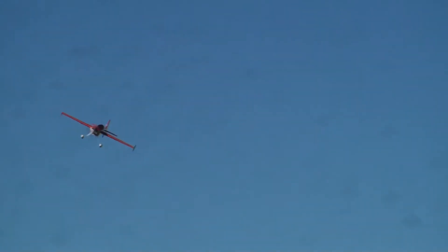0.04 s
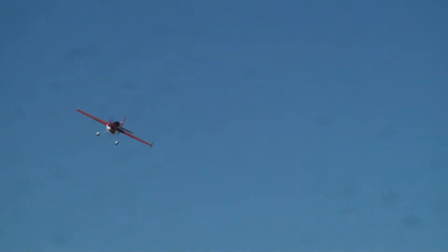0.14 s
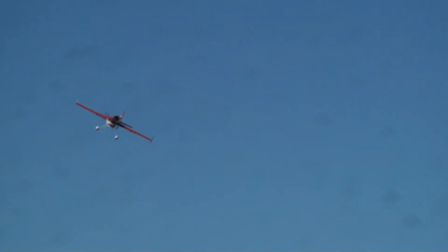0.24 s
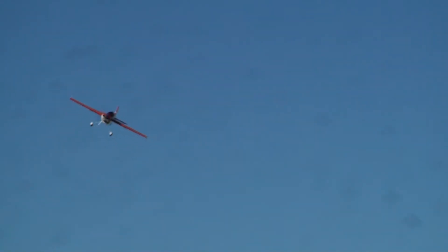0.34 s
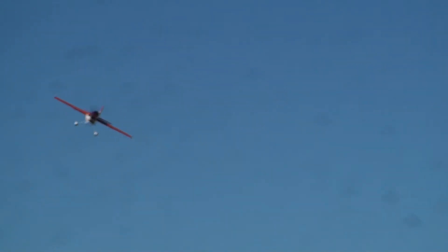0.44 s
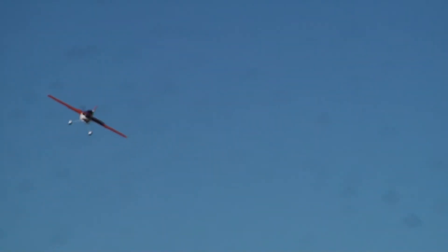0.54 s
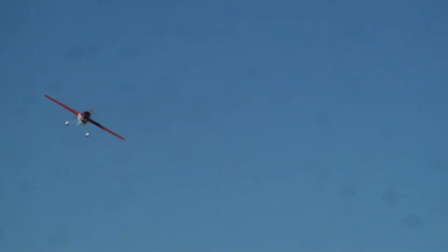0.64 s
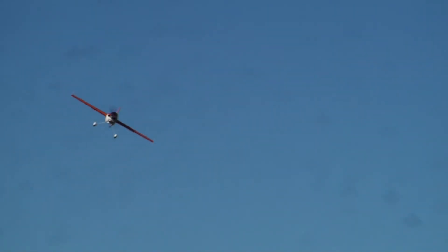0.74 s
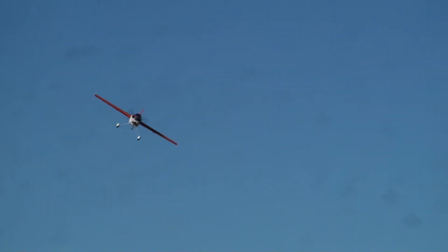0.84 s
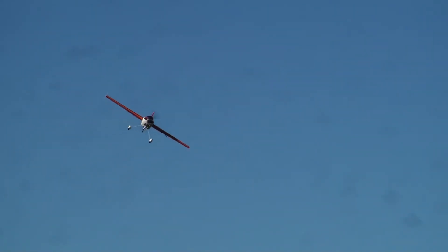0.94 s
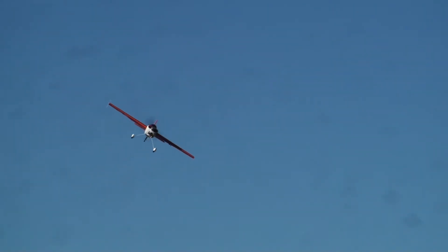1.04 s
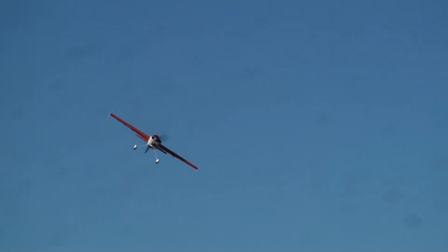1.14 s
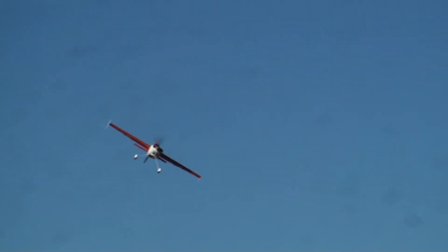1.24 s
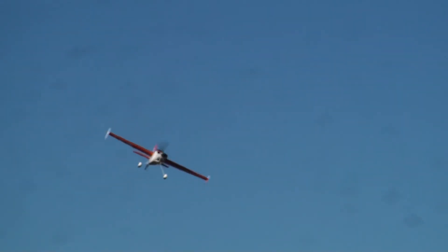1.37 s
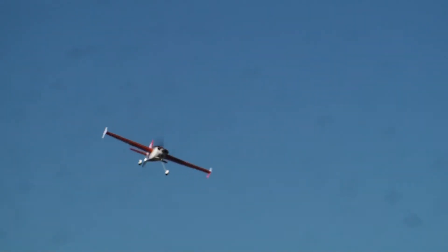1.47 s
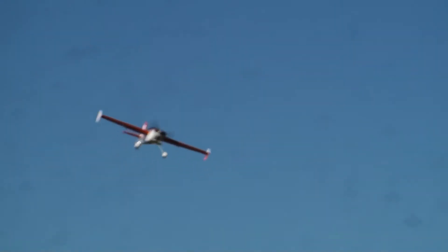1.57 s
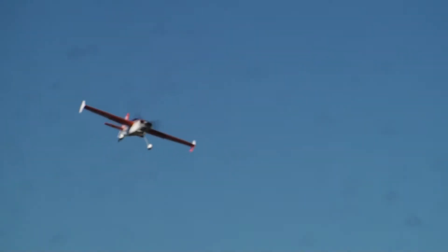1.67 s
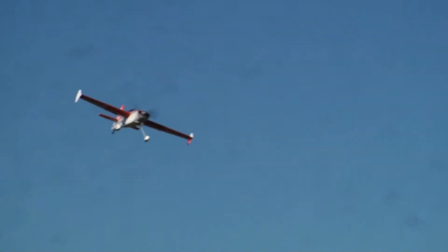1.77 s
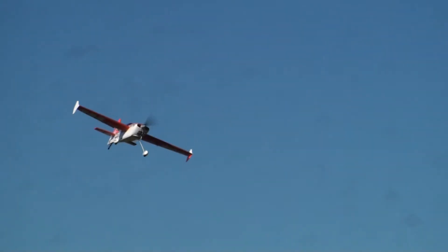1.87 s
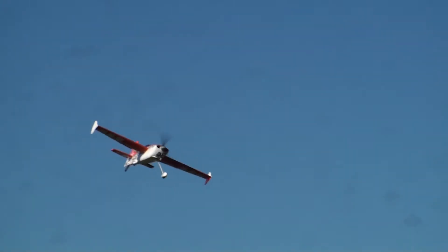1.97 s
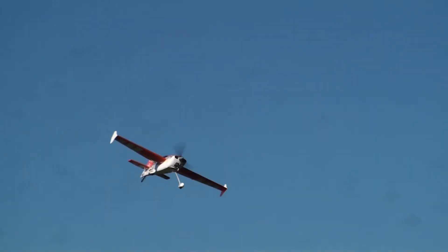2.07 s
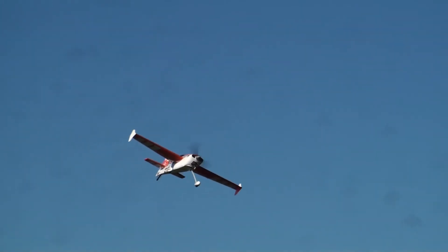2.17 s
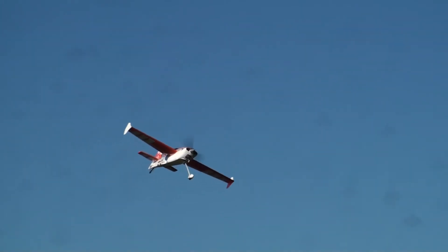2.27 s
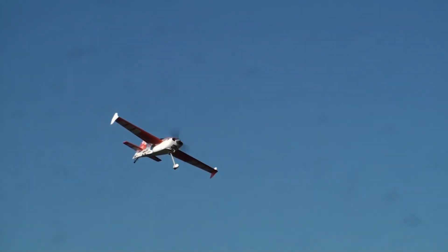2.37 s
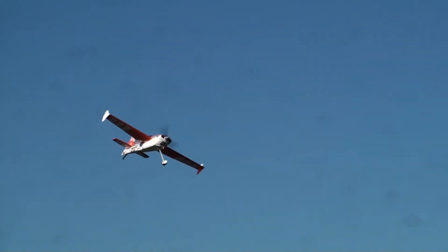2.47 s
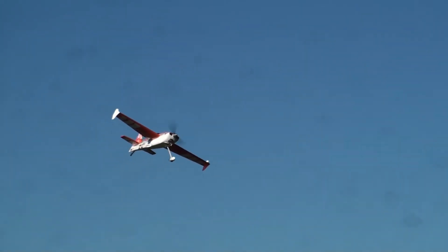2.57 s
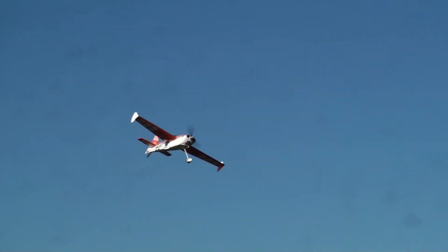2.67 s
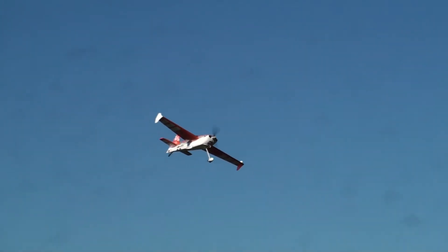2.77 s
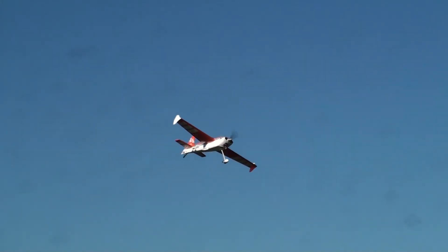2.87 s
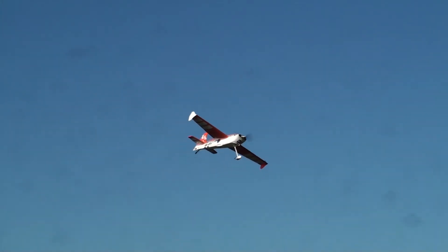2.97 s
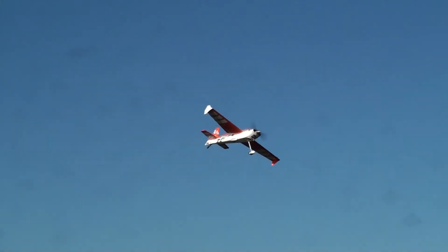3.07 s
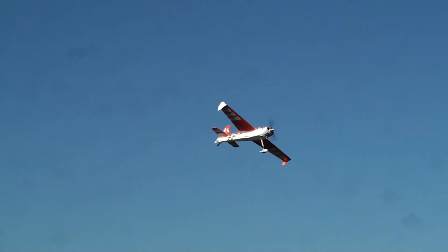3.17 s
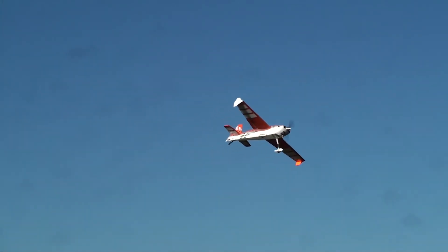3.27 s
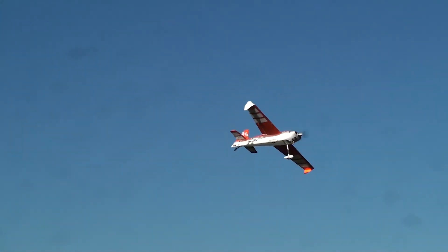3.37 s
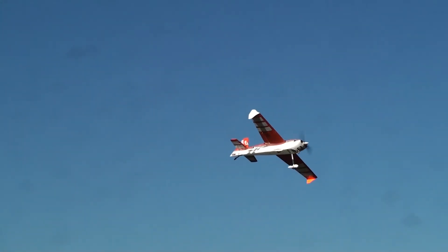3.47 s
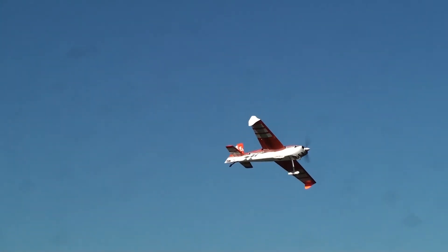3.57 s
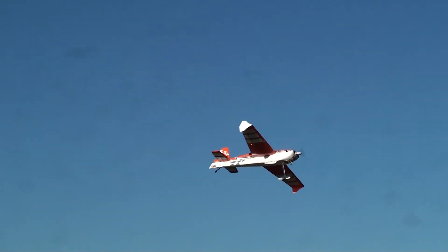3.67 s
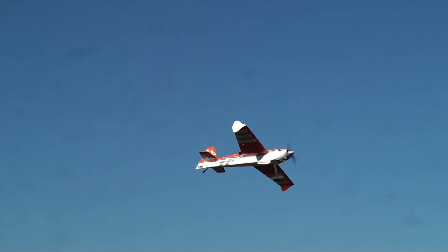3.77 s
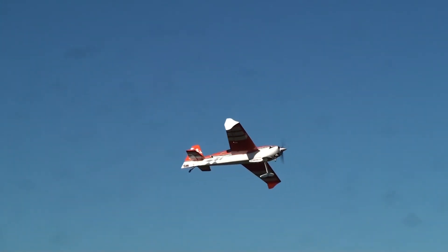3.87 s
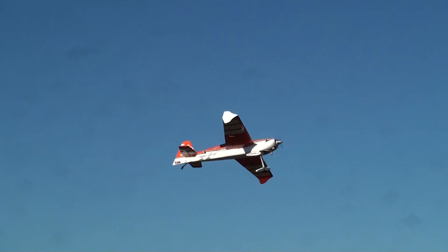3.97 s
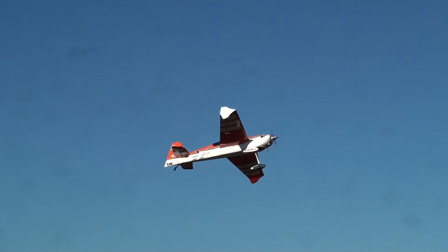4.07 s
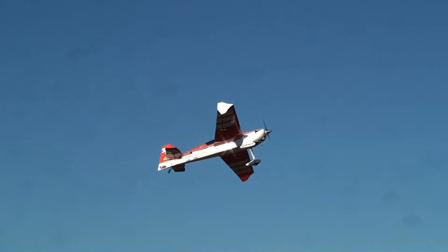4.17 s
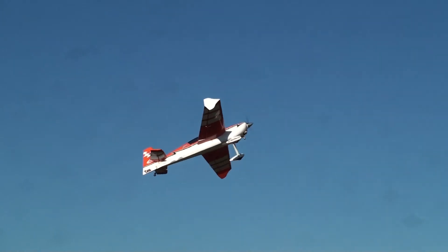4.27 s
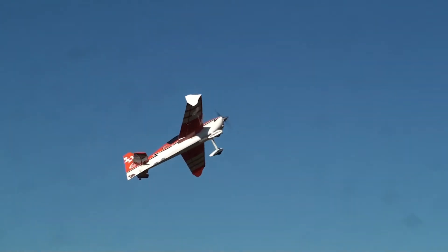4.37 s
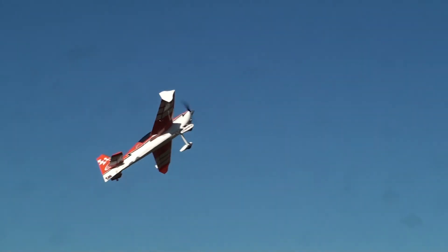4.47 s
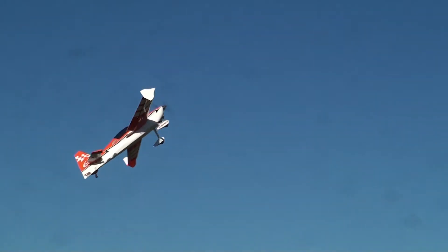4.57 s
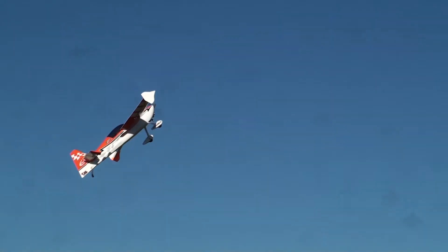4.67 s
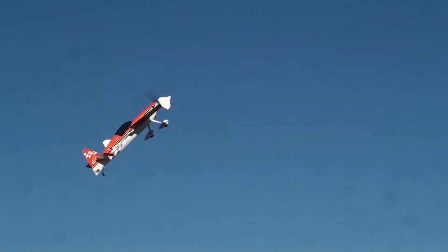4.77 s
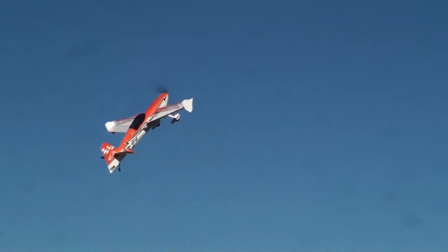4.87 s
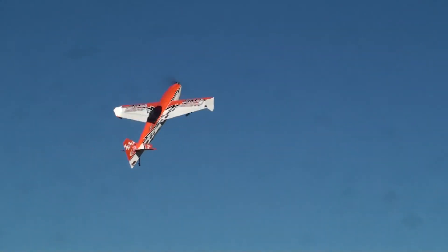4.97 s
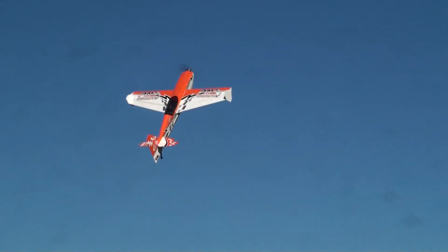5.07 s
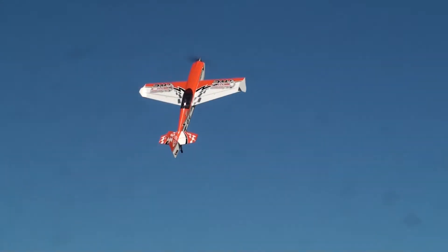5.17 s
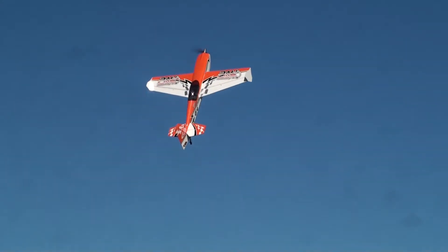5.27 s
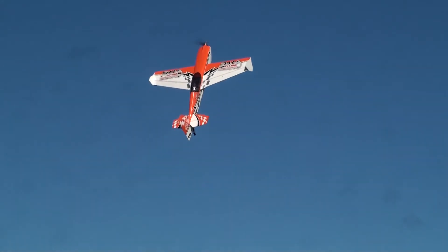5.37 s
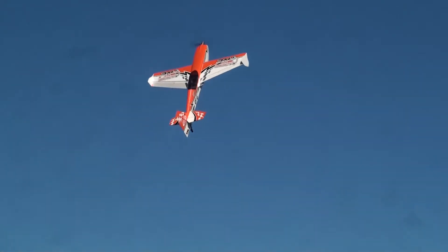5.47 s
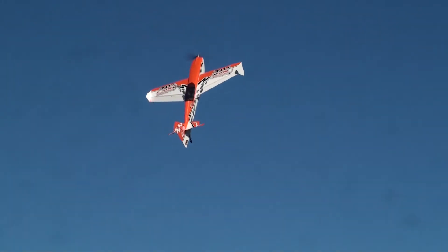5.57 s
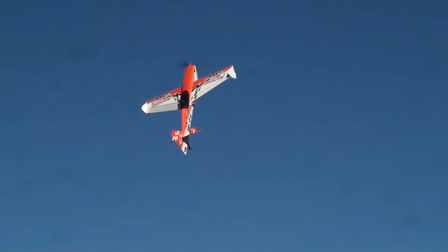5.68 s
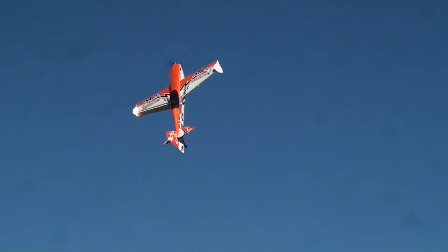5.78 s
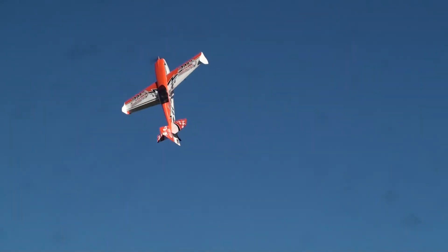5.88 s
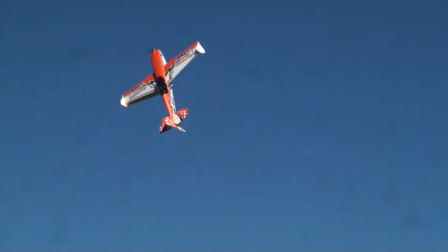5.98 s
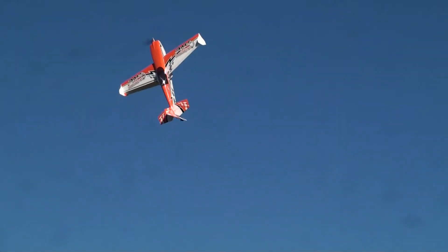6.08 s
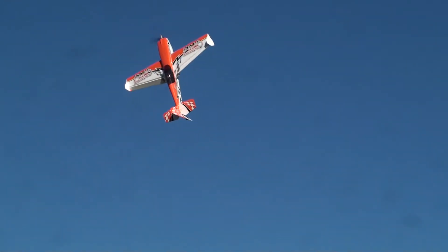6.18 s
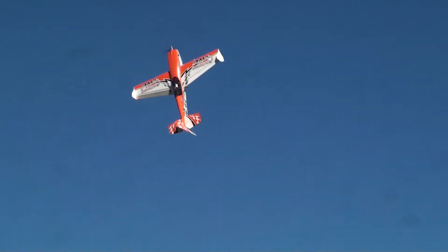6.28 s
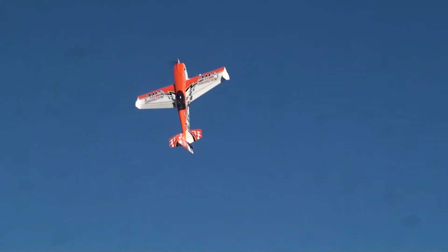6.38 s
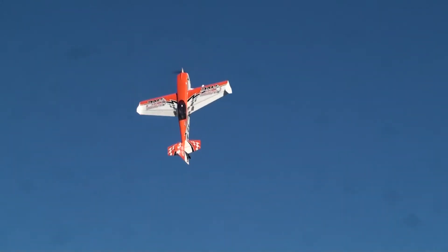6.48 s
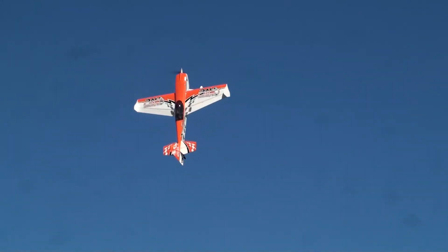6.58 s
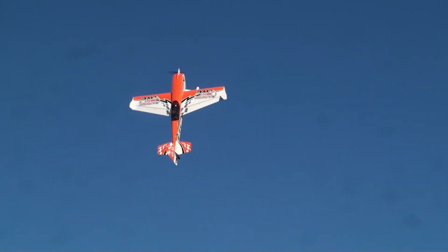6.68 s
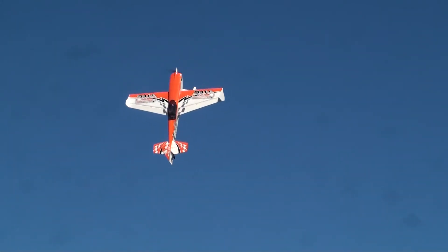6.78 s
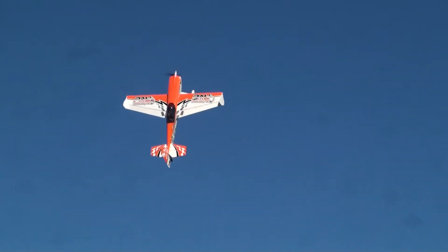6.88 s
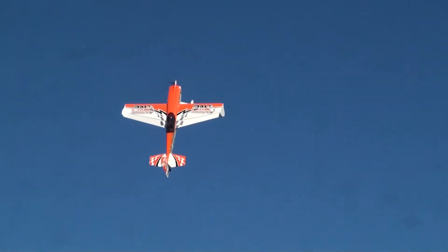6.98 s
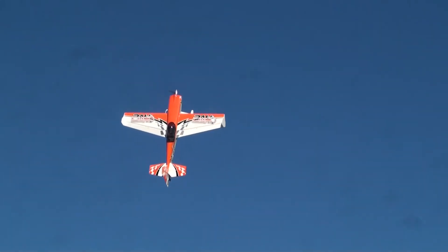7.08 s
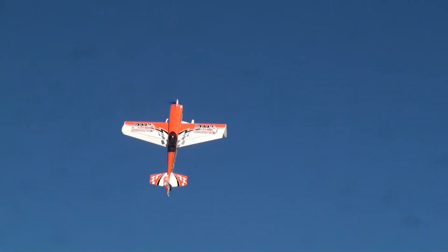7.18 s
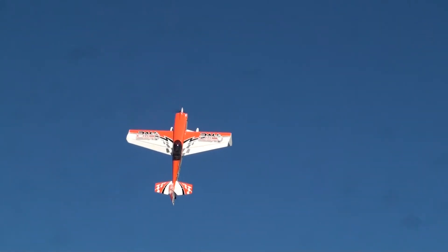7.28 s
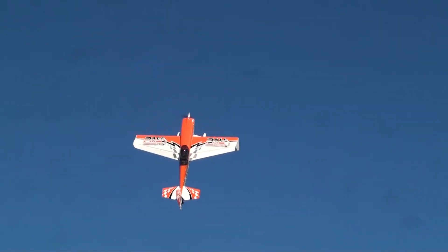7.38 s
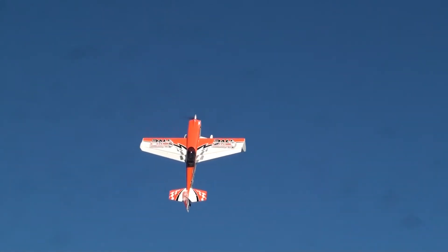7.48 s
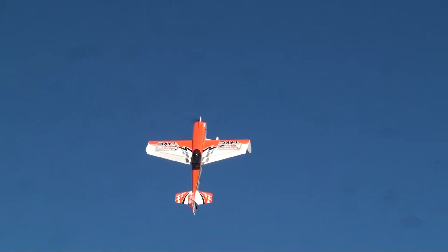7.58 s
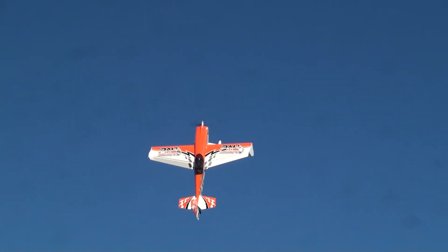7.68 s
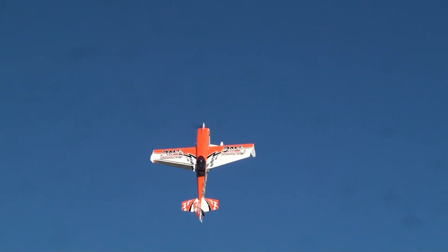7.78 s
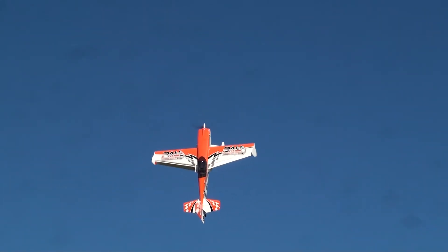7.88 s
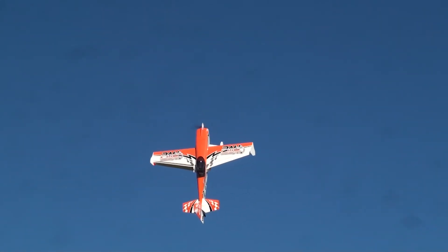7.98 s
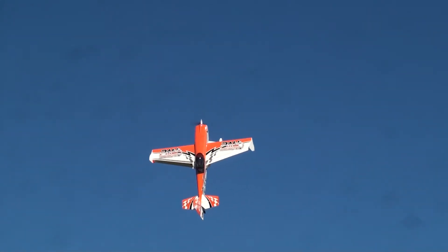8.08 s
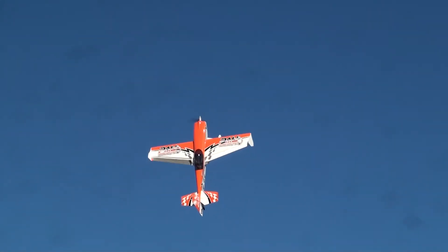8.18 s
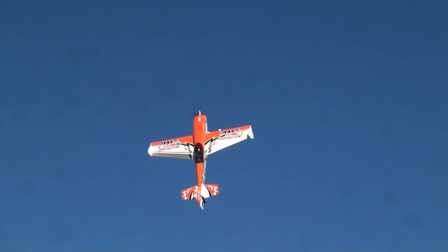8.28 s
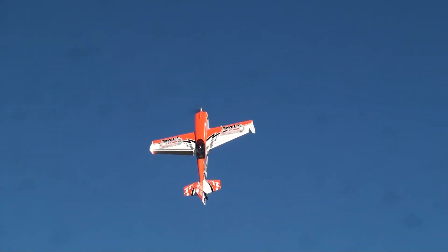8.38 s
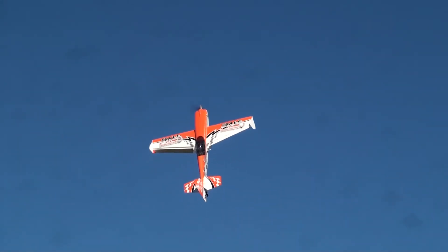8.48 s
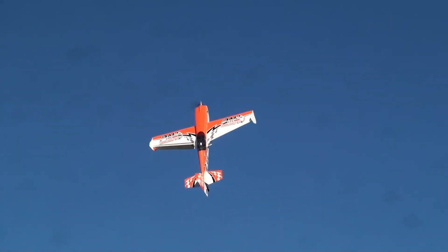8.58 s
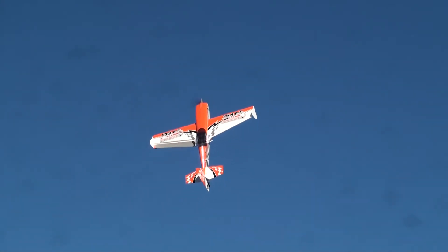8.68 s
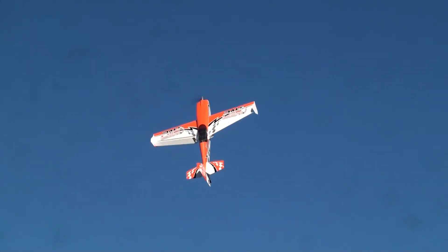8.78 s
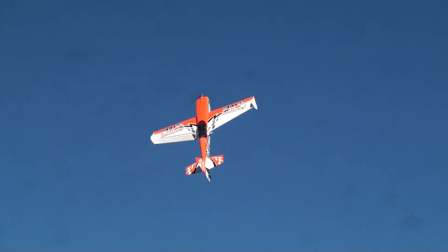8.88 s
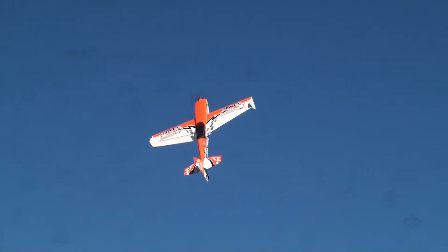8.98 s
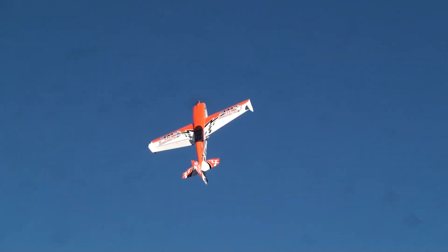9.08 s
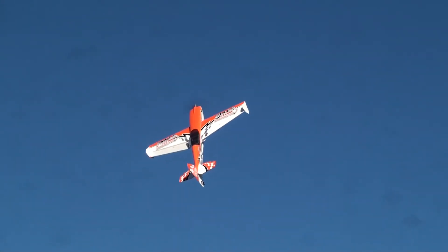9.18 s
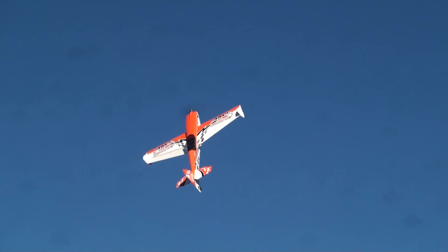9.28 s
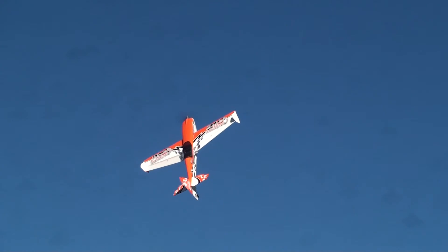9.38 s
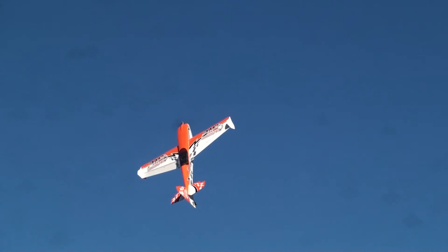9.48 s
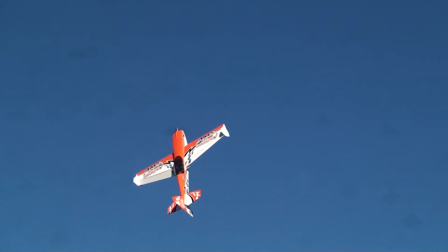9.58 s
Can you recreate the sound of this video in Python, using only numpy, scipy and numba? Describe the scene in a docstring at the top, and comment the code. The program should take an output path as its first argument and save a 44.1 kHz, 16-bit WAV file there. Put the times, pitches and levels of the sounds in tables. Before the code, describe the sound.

In an open field, a band of insects shrills with a fast, even trill over faint air hush, with thin high cricket chirps fading early. From 0 to 4 s a small model aeroplane engine glides nearer at idle: a quiet, even putter of about 43 firings a second, hollow and ticking, slowing slightly, with soft propeller hiss and isolated pops from 3.2 s. At 4.1 s it bursts into hard cracking pops, sags by 4.6, then pops and climbs into a loud snarl peaking at 5.2, with heavy low bass swells. Revs drop at 5.5, rise to 6.05, dip, rise briefly to 6.7, then sink to a ragged low putter near 7.2. It pops and surges again, reaching a sustained raspy drone by 7.7, easing slightly in pitch, with hiss and a faint blade tone after 9 s, still running at 9.6. The louder engine leans left.

```python
"""A two-stroke model aeroplane glides in at idle, blips its throttle four times pulling up, then hangs on its propeller.
Each firing rings the silencer and lets out a puff of gas: an even putter at idle, hard pops in the run-ups,
a snarl under power. Shaped noise makes the propeller hiss; a delayed ground bounce combs the plane's sound.
Insects shrill in the grass as ticking bands of noise. Low noise swells as wind on the stereo microphone,
and as the plane's own low bass at the first two pull-ups."""
import sys
import numpy as np
from scipy import signal
from scipy.fft import rfft, irfft, next_fast_len
from scipy.io import wavfile
from scipy.ndimage import uniform_filter1d
from numba import njit

SR = 44100
rng = np.random.default_rng(int(sys.argv[2]) if len(sys.argv) > 2 else 0)


def store_wav(level_fs):
    """Save 16-bit WAV to argv[1]."""
    pcm = np.round(np.clip(np.atleast_2d(level_fs), -1, 1) * 32767)
    wavfile.write(sys.argv[1], SR, pcm.T.astype(np.int16))


N = 424683
TIME = np.arange(N) / SR


def undb(db):
    """Decibels to gain."""
    return 10 ** (np.asarray(db) / 20)


def curves(table):
    """Every column of a timed table, sample by sample."""
    s, *columns = np.transpose(table)
    return [np.interp(TIME, s, column) for column in columns]


def over_hz(table, freqs):
    """Every column of a spectrum, joined on a log-frequency axis."""
    hz, *columns = np.transpose(table)
    return [np.interp(np.log(freqs + 1), np.log(hz), column) for column in columns]


def unit(x):
    """Scale to a standard deviation of 1."""
    return x / np.std(x)


def steady(x, size=5000):
    """Scale to a running rms near 1, so that a level curve alone sets the loudness."""
    power = uniform_filter1d(uniform_filter1d(x * x, size), size)
    return x / np.sqrt(np.abs(power) + 1e-12)


def noise(spectrum):
    """Unit-level noise with the given colour."""
    size = next_fast_len(N, True)
    db, = over_hz(spectrum, np.fft.rfftfreq(size, 1 / SR))
    white = rfft(rng.standard_normal(size))
    return unit(irfft(white * undb(db), size)[:N])


def walk(rate_hz):
    """Random wander: straight lines between normal draws."""
    return np.interp(TIME * rate_hz, np.arange(4096), rng.standard_normal(4096))


def ring(x, modes):
    """Sum of two-pole resonances, neighbours in opposite polarity."""
    total = 0
    for k, (hz, width_hz, db) in enumerate(modes):
        b, a = signal.iirpeak(hz, hz / width_hz, SR)
        total = total + (-1) ** k * undb(db) * signal.lfilter(b, a, x)
    return total


@njit
def sweep(x, hz, width_hz):
    """State-variable resonance whose centre moves."""
    y, band_state, low_state = np.empty(len(x)), 0., 0.
    for i in range(len(x)):
        g, damping = np.tan(np.pi * hz[i] / SR), width_hz / hz[i]
        # the tiny offset keeps the states out of denormals
        v = (band_state + g * (x[i] + 1e-18 - low_state)) / (1 + g * (g + damping))
        band_state = 2 * v - band_state
        low_state = low_state + 2 * g * v
        y[i] = damping * v
    return y


def band(x, low_hz, high_hz):
    """Second-order Butterworth band-pass."""
    return signal.sosfilt(signal.butter(2, [low_hz, high_hz], "band", fs=SR, output="sos"), x)


def clicks(times, sizes):
    """One click at each time, shared between two samples."""
    place = np.clip(times * SR, 0, N - 2)
    i = place.astype(int)
    late = place - i
    return np.bincount(i, sizes * (1 - late), N) + np.bincount(i + 1, sizes * late, N)


# Colour of the insects. Each row: frequency in Hz, relative level in dB per Hz.
INSECT_COLOUR = [(3000,-87),(3750,-23),(4050,-2.5),(4400,-10),(4650,-1),(4950,-59),(6000,-37)]
# Insects in the grass. Each row: time in seconds, level in dB.
GRASS = [(0,-55.5),(4,-52.5),(5.5,-61),(9.6,-55.5)]


def insects(trill_hz=75.1, trill_depth_db=3.5):
    """Insects in the grass shrill: a band of noise whose level trills fast and evenly."""
    angle = 2 * np.pi * (trill_hz * TIME + .04 * walk(5))
    trill_db = trill_depth_db * np.sin(angle)
    return steady(noise(INSECT_COLOUR), size=300) * undb(curves(GRASS)[0] + trill_db)


# Bush cricket. Each row: time in seconds, level in dB.
CRICKET = [(0, -67), (1.3, -68), (4, -88)]


def cricket(warble_rate_hz=5.0, pitch_hz=9200, warble_hz=350):
    """A bush cricket scrapes thin chirps, two per warble: resonated noise gliding up and down."""
    angle = 2 * np.pi * (warble_rate_hz * TIME + 0.2 * walk(3))
    hz = pitch_hz + warble_hz * np.sin(angle)
    once = sweep(rng.standard_normal(N), hz, 450.)
    scrape = unit(sweep(once, hz, 450.))
    return np.abs(np.sin(angle)) * scrape * undb(curves(CRICKET)[0])


# Low swells: gusts on the microphone, and the plane's low bass at the first two pull-ups (4.26, 4.89 s).
# Each row: peak time in seconds, half length in seconds, level in dB before trims.
LOW_SWELLS = [(0.05, 0.18, -45), (2.674, 0.085, -43), (3.879, 0.14, -43.5), (4.258, 0.15, -31),
              (4.893, 0.46, -32.5), (5.985, 0.33, -37), (7.854, 0.5, -44)]


def low_swells(calm_db=-71):
    """Strength of the low noise: a calm floor plus bell-shaped swells."""
    strength = undb(calm_db)
    for s, half_length_s, db in LOW_SWELLS:
        strength = strength + undb(db) * np.exp(-((TIME - s) / half_length_s) ** 2)
    return strength


# Colour of the open-air hush. Each row: frequency in Hz, relative level in dB per Hz.
FIELD = [(40,-6.5),(150,-9.5),(400,-6),(900,-13.5),(2000,-16),(3500,-19.5),(6000,-24),(9000,-33),(15000,-59)]
# Colour of the low noise. Each row: frequency in Hz, relative level in dB per Hz.
LOW_NOISE = [(20,-14),(50,11.5),(90,8.5),(150,3.5),(300,-3.5),(800,-39.5)]


def outdoors(own_insects_db=-2.0):
    """Open-air hush, trilling insects all around and swelling low noise, partly separate at each port."""
    swell = low_swells()
    shared = noise(FIELD) * undb(-48.5) + insects() + cricket() + noise(LOW_NOISE) * swell * undb(-6)
    ports = []
    for _ in range(2):
        hush = noise(FIELD) * undb(-63)
        shrill = insects() * undb(own_insects_db)
        rumble = noise(LOW_NOISE) * swell * undb(0.5 + 1.3 * walk(5.4))
        ports.append(shared + hush + shrill + rumble)
    return np.array(ports)


# Ground bounce. Each row: time in seconds, lag behind the direct sound in ms.
BOUNCE = [(0, 1.86), (1.7, 1.56), (3, 1.79), (4.2, 2.1), (5, 2.546), (6, 3.43), (6.7, 4.33), (7.3, 4.42),
          (8.1, 4), (8.9, 4.51), (9.63, 4.23)]


def ground(x, share):
    """Direct sound plus its bounce off the grass; the moving lag combs the spectrum."""
    lag_s = curves(BOUNCE)[0] / 1000
    return x + share * np.interp(TIME - lag_s, TIME, x)


def steepness():
    """Soft grass returns the bass only once the plane is high and the bounce is steep, 0-1 from its lag."""
    return np.clip((curves(BOUNCE)[0] - 1.8) / 2, 0, 1)


# Engine speed as heard. Each row: time in seconds, firings per second in Hz.
SPEED = [(0.0, 43.3), (0.53, 44.0), (1.43, 44.33), (1.69, 42.45), (2.14, 42.55), (4.1, 38.58), (4.27, 64),
         (4.37, 74.17), (4.53, 56.55), (4.66, 49.6), (4.86, 78.4), (5.12, 101.3), (5.22, 107.2),
         (5.295, 104.2), (5.4, 80.75), (5.495, 66.06), (5.62, 80.35), (5.83, 91.4), (6.0, 101.8),
         (6.07, 103), (6.255, 69.28), (6.41, 85.6), (6.71, 89.7), (6.85, 68.5), (7.0, 55.7), (7.18, 43.65),
         (7.28, 47), (7.35, 60.24), (7.44, 74.23), (7.6, 89.5), (7.715, 96.93), (7.98, 97.24),
         (8.39, 94.54), (8.53, 94.14), (8.78, 89.66), (9.2, 88.2), (9.48, 88.85), (9.63, 88.2)]


def speed(size=1100):
    """Firings per second; the flywheel rounds every change."""
    return uniform_filter1d(curves(SPEED)[0], size, mode="nearest")


FULL_HZ = 102.86  # speed that load 1 holds


def load(spin_up_s=0.27, max_load=1.007):
    """Torque that the engine gives: propeller drag plus what it takes to spin up."""
    share = speed() / FULL_HZ
    drag = share ** 2
    return np.clip(drag + spin_up_s * np.gradient(share) * SR, 0, max_load)


# The plane nears, then turns its back. Each row: time in seconds, nearness in dB,
# then trims in dB of the rasp, of the treble and of the bark.
FLIGHT = [(0, -21.5, 0, 3, -9), (1.5, -13, -18, 10, -5), (3.4, -1.5, -51, 3.5, -8.5),
          (4.25, 1.5, -2, -3.5, -1), (4.95, -0.5, -2.5, -1, -2), (5.25, -3.5, -3, -0.5, -0.5),
          (5.6, -0.5, -4, -14, -2.5), (6.0, -3.5, -2, -6, -1), (6.6, -2, 0.5, -11, -3),
          (7.1, -4, 7, -10.5, 3), (7.7, -2.5, -8.5, -4.5, 0), (8.7, 0, -1, -3, -3),
          (9.63, -0.2, -3.5, -0.5, -5.5)]


def voice_db(full_db, per_load_db, per_octave_db):
    """Level of one voice: its value at full speed and load, moved by load, speed and nearness."""
    octaves = np.log2(speed() / FULL_HZ)
    return full_db + per_load_db * (load() - 1) + per_octave_db * octaves + curves(FLIGHT)[0]


# Exhaust roughness, least on a steady full throttle. Each row: time in seconds, extra gas noise in dB.
ROUGHNESS = [(4.6, 0), (5.0, -3), (5.3, -5), (5.6, -4), (7.4, -3), (7.75, -7), (8.55, -7), (8.95, -3.5)]


def turbulence_db(coasting_db=9.5, per_load_db=-8.5):
    """Gas noise against the firings: an engine under load burns more cleanly."""
    return coasting_db + per_load_db * load() + curves(ROUGHNESS)[0]


# The hardest single firings. Each row: time in seconds, click strength in dB.
POPS = [(1.371, -25), (1.7405, -22), (2.089, -24.5), (3.212, -19), (3.584, -22), (3.659, -23.5),
        (3.711, -23), (3.761, -25.5), (3.835, -20.5), (3.991, -23.5), (4.069, -27), (4.0948, -16),
        (4.1195, -17), (4.1424, -12), (4.1644, -10), (4.185, -11.5), (4.221, -9.5), (4.254, -10),
        (4.285, -8.5), (4.314, -12), (4.383, -24), (4.621, -15.5), (4.662, -12), (4.699, -13),
        (4.736, -11.5), (4.768, -16), (4.826, -12), (5.495, -22), (6.259, -23), (7.152, -20), (7.221, -17),
        (7.263, -17), (7.284, -20), (7.304, -19)]


def crank():
    """Turns of the crankshaft, bent slightly so that each listed pop falls on a whole turn."""
    turns = np.cumsum(speed()) / SR
    s = np.array(POPS)[:, 0]
    phase_error = np.unwrap(np.interp(s, TIME, turns) % 1, period=1)
    return turns - np.interp(TIME, s, phase_error)


def firing_times(turns):
    """One firing at every whole turn, in seconds."""
    return np.interp(np.arange(1, int(turns[-1]) + 1), turns, TIME)


def firing_train(turns, scatter_db):
    """A click of uneven strength at every firing."""
    times = firing_times(turns)
    return unit(clicks(times, undb(scatter_db * rng.standard_normal(len(times)))))


def puffs(turns, length, between):
    """Turbulence that flares with each firing, dies over a length in turns and simmers in between."""
    return unit((between + np.exp(-(turns % 1) / length)) * rng.standard_normal(N))


def wash():
    """The propeller's slipstream churns in the low bass, most while the engine labours."""
    churn = unit(band(rng.standard_normal(N), 32, 510))
    return churn * undb(voice_db(full_db=-64, per_load_db=1.8, per_octave_db=-1.9))


# Propeller tone. Each row: multiple of the shaft speed, relative level in dB.
BLADE_ORDERS = [(4, 5.5), (6, 2), (8, -1.5), (10, -2), (14, -16)]
# Propeller tone over time. Each row: time in seconds, level in dB.
BLADES = [(8.9, -71), (9.15, -36), (9.63, -38.5)]


def blades(turns):
    """Two blades beat on the even multiples of the shaft, heard once the hovering plane tilts."""
    tone = sum(undb(db) * np.sin(2 * np.pi * order * turns) for order, db in BLADE_ORDERS)
    return tone * undb(curves(BLADES)[0])


# Colour of the propeller hiss. Each row: frequency in Hz, relative level in dB per Hz.
HISS = [(700,9),(1800,6.5),(3000,5.5),(4200,2),(5000,1.5),(5700,4),(6500,-1),(7800,0),(9500,-8.5),(12000,-9),(14000,-18.5),(16000,-39)]


def propeller(turns, flutter_db=1.66):
    """Air tearing at the blades and the exhaust port: hiss pulsing once a turn."""
    hiss_db = voice_db(full_db=-31.5, per_load_db=11.04, per_octave_db=4.3) + curves(FLIGHT)[2]
    pulse = .9 * undb(.5 * turbulence_db()) + np.exp(-(turns % 1) / .1)
    hiss = steady(ground(noise(HISS) * pulse, share=0.27))
    return hiss * undb(hiss_db + flutter_db * walk(35))


# Hum of the idle. Each row: time in seconds, rms level in dB of the 3rd, 5th and 7th multiple of the firing rate.
HUM = [(0, -61, -67, -59.5), (1.3, -73, -67.5, -59), (2.3, -64.5, -54.5, -61.5), (3.1, -58.5, -51.5, -60),
       (4.05, -44.5, -58, -63), (4.3, -67, -72, -68)]


def hum(turns):
    """The even idle carries a few clean low tones."""
    total = 0
    for order, db in zip((3, 5, 7), curves(HUM)):
        total = total + np.sqrt(2) * undb(db) * np.cos(2 * np.pi * order * turns)
    return total


# Idling silencer. Each row: resonance in Hz, width in Hz, relative level in dB.
PUTTER = [(368, 270, 0), (542, 256, 8.5)]
# Hollow pipe at idle. Each row: resonance in Hz, width in Hz, relative level in dB.
HOLLOW = [(1000, 29, -8), (1580, 75, 6), (2590, 50, 4), (3250, 110, -14)]
# Shut-throttle engine. Each row: time in seconds, level in dB of the ticks, of the hollow ring, of the chug.
COASTING = [(0, -54, -60, -63), (1.3, -51, -59, -68), (2.5, -47.5, -62, -58), (3.1, -43, -51.5, -54),
            (4.05, -40.5, -48.5, -44.5), (4.55, -36.5, -46.5, -50), (4.8, -47, -59, -57)]


def putter(turns, chug_hz=195, chug_width_hz=70):
    """With the throttle shut, even firings tick and chug in the silencer and their gas rings the hollow pipe."""
    tick_db, hollow_db, chug_db = curves(COASTING)
    firings = firing_train(turns, scatter_db=0.6)
    gas = 1.3 * puffs(turns, length=0.12, between=0.091)
    ticks = band(ring(firings, PUTTER), 205, 660)
    chug = band(ring(firings, [(chug_hz, chug_width_hz, 0)]), 106, 200)
    hollow = band(ring(firings + gas, HOLLOW), 1090, 2600)
    return (steady(ground(ticks, share=0.66)) * undb(tick_db)
            + steady(chug) * undb(chug_db)
            + steady(ground(hollow, share=0.4)) * undb(hollow_db))


# Ragged firing between blips. Each row: time in seconds, level in dB.
STUMBLE = [(4.8, -87), (5.42, -40), (5.7, -47.5), (6.2, -33.5), (6.65, -51), (6.77, -32), (6.85, -41),
           (6.91, -32.5), (7.25, -38), (7.35, -26), (7.43, -38), (7.52, -31), (7.7, -91)]


def stumble(turns, hz=238, width_hz=70):
    """Between blips the engine fires weakly into the cooled silencer, which rings lower."""
    drive = firing_train(turns, scatter_db=1.8) + 0.3 * puffs(turns, length=0.5, between=0.3)
    pipe = band(ring(drive, [(hz, width_hz, 0)]), 169, 256)
    return steady(pipe) * undb(curves(STUMBLE)[0])


def pipe_note(turns, path, width_hz, rough):
    """Under power, firings sound a resonance that shifts as the pipe heats and the plane turns."""
    hz, db = curves(path)
    drive = firing_train(turns, scatter_db=2.9) + rough * puffs(turns, length=0.61, between=0.4)
    once = sweep(drive, hz, float(width_hz))
    note = sweep(once, hz, float(width_hz))
    return steady(ground(note, share=0.25)) * undb(db)


# Lower honk under power. Each row: time in seconds, centre in Hz, level in dB.
HONK = [(4.1, 900, -67), (4.3, 870, -33), (4.5, 820, -54), (4.8, 760, -34), (5.05, 760, -26.5),
        (5.25, 843, -39.5), (5.4, 780, -49), (5.9, 745, -37), (6.2, 810, -47), (6.45, 700, -35),
        (6.68, 950, -42.5), (6.85, 795, -72), (7.3, 735, -58), (7.55, 740, -31), (8.5, 680, -38.5),
        (8.7, 760, -48), (9.63, 714, -59)]
# Bright edge under power. Each row: time in seconds, centre in Hz, level in dB.
EDGE = [(4.7, 1714, -68), (5.03, 1570, -45), (5.1, 1840, -43), (5.25, 1770, -30.5), (5.33, 1770, -50),
        (5.7, 1610, -72), (6.02, 1790, -49), (6.2, 1670, -64), (6.45, 1530, -51), (6.7, 1500, -69),
        (6.8, 1388, -75), (7.4, 1220, -63), (7.75, 1130, -51), (8.1, 1190, -39), (8.2, 1930, -47),
        (8.65, 1880, -40), (8.9, 1490, -61), (9.63, 1190, -50)]


def pipe_notes(turns):
    """Two shifting pipe resonances, a low honk and a bright edge."""
    honk = pipe_note(turns, HONK, width_hz=230, rough=0.2)
    edge = pipe_note(turns, EDGE, width_hz=520, rough=0.12)
    return honk + edge


def hardness(surge_hz_per_s=150, until_hz=79.3, fade_hz=9.9, build_s=0.022):
    """How hard the charges go off, 0-1: most when the throttle opens at low revs, building over a few firings."""
    hz = speed()
    gaining = np.clip(np.gradient(hz) * SR / surge_hz_per_s, 0, 1)
    low_revs = np.clip((until_hz - hz) / fade_hz, 0, 1)
    keep = np.exp(-1 / (build_s * SR))
    return signal.lfilter([1 - keep], [1, -keep], gaining * low_revs)


def pop_sizes(times, hard_db=-10.5, scatter_db=0.9):
    """Click strength of every firing: hardness, distance and chance; the listed pops have their own."""
    near_db, _, treble_db, _ = curves(FLIGHT)
    strength = hardness() * undb(hard_db + near_db + treble_db)
    sizes = np.interp(times, TIME, strength) * undb(scatter_db * rng.standard_normal(len(times)))
    for s, pop_db in POPS:
        sizes[np.argmin(np.abs(times - s))] = undb(pop_db)
    return sizes


# Outlet rung by a steep front, low then high. Each row: resonance in Hz, width in Hz, relative level in dB.
OUTLET = [(1520, 600, 10), (2650, 300, 13)]
# Colour of a hard firing's gas burst. Each row: frequency in Hz, relative level in dB per Hz.
CRACK = [(200, -13), (600, -6), (950, -7), (1250, -1), (1650, 4.5), (2100, -5), (2700, -0.5), (3700, -11),
         (7000, -15), (14000, -23.5), (16000, -34)]


def pops(turns, front_hz=410, rear_hz=280, width_hz=260, thud_db=5.5, gas_s=0.0011, gas_db=-13,
         rear_gas_db=-6.5, rear_snap_db=-8, bright_from_hz=22, bright_full_hz=58.4):
    """A rich charge goes off as a thud with a snap and a short burst of gas, all duller from behind."""
    times = firing_times(turns)
    hits = clicks(times, pop_sizes(times))
    rear = steepness()
    # faster firings crack brighter
    bright = np.clip((speed() - bright_from_hz) / (bright_full_hz - bright_from_hz), 0, 1)
    push = np.convolve(hits, np.hanning(52), "same")
    thud = sweep(push, front_hz + (rear_hz - front_hz) * rear, float(width_hz))
    rung = ring(hits, OUTLET[:1]) - ring(hits * bright, OUTLET[1:])
    snap = band(rung, 740, 3600) * undb(rear_snap_db * rear)
    age = np.arange(1024) / SR / gas_s
    flare = age * np.exp(1 - age)
    burst = signal.fftconvolve(hits * bright, flare)[:N] * noise(CRACK)
    gas = burst * undb(gas_db + rear_gas_db * rear)
    return ground(thud * undb(thud_db) + snap + gas, share=0.51)


def smear(x, size=57, share=0.64):
    """Echoes inside the silencer spread each firing without colouring it: an all-pass."""
    taps = np.r_[share, np.zeros(size), 1]
    return signal.lfilter(taps, taps[::-1], x)


def uneven_firings(turns, idle_hz=40.2, idle_scatter_db=1.5):
    """Weak combustion is uneven in both timing and strength; the scatter shrinks with speed."""
    times = firing_times(turns)
    scatter_db = idle_scatter_db * idle_hz / np.interp(times, TIME, speed())
    chance = rng.standard_normal((len(times), 2))
    jitter_s = 2e-5 * scatter_db * chance[:, 0]
    return unit(clicks(times + jitter_s, undb(scatter_db * chance[:, 1])))


def off_tune(from_hz=53, ramp_hz=24.9, on_tune_hz=83.1, on_tune_width_hz=1.2):
    """How far the silencer is off tune, 0-1: at low speed a close-lying harmonic always sounds it."""
    hz = speed()
    leaving_idle = np.clip((hz - from_hz) / ramp_hz, 0, 1)
    return leaving_idle / (1 + np.exp((hz - on_tune_hz) / on_tune_width_hz))


# Exhaust bass. Each row: resonance in Hz, width in Hz, relative level in dB.
BOOM = [(90.5, 27, -13.5), (205, 92, -36), (286.7, 43.2, 7)]
# Exhaust middle. Each row: resonance in Hz, width in Hz, relative level in dB.
BARK = [(432, 88, 15), (828, 68, 6), (1014, 1440, -8.5)]
# Exhaust treble. Each row: resonance in Hz, width in Hz, relative level in dB.
RASP = [(1267, 1100, 1), (1686, 650, 4.5), (1902, 350, 2.5), (2900, 510, -11.5), (4500, 310, -12)]


def engine(turns, off_tune_db=-8.5):
    """One uneven firing a turn drives the exhaust resonances, cleanly in the bass and roughly in the treble."""
    firings, rough = uneven_firings(turns), undb(turbulence_db())
    bass = firings + 0.17 * rough * puffs(turns, length=0.58, between=0.54)
    middle = firings + 0.5 * rough * puffs(turns, length=0.6, between=0.6)
    treble = firings + rough * puffs(turns, length=0.4, between=0.25)
    boom = band(ring(bass, BOOM), 53, 920)
    bark = band(ring(middle, BARK), 451, 1005)
    rasp = band(ring(smear(treble), RASP), 360, 2600)
    _, rasp_trim_db, _, bark_trim_db = curves(FLIGHT)
    boom_db = voice_db(full_db=-17.5, per_load_db=8.3, per_octave_db=19.3) + off_tune_db * off_tune()
    bark_db = voice_db(full_db=-23, per_load_db=10.2, per_octave_db=5.3) + bark_trim_db
    rasp_db = voice_db(full_db=-27.5, per_load_db=24.5, per_octave_db=1.8) + rasp_trim_db
    return (steady(ground(boom, share=1.09 * steepness())) * undb(boom_db)
            + steady(ground(bark, share=1.0)) * undb(bark_db)
            + steady(ground(rasp, share=0.98)) * undb(rasp_db))


def scattered(x, db=-16.5, t60_s=0.18):
    """Rough ground and field edges send back a faint, short wash, different at each port."""
    age_s = np.arange(int(.4 * SR)) / SR
    tails = band(rng.standard_normal((2, len(age_s))), 363, 3060)
    tails = tails * undb(-60 * age_s / t60_s) * (age_s > .006)
    tails = tails / np.sqrt(np.sum(tails ** 2, axis=1, keepdims=True))
    return signal.fftconvolve(x[None], tails, axes=1)[:, :N] * undb(db)


# Microphone pair at full bearing. Each row: frequency in Hz, left minus right in dB, left lead in rad.
PORTS = [(60,6,1),(254,4,0.84),(507,4.5,0.37),(1200,3,0.1),(2360,2.5,0.04),(7550,1.5,.02)]
# The plane's angle off the microphone's axis. Each row: time in seconds, bearing from 0 to 1.
BEARING = [(0, 0.22), (4.2, 0.28), (4.7, 0.59), (5.2, 1), (9.63, 1)]


def microphones(x):
    """The plane is off axis: the left port hears it louder and earlier."""
    size = next_fast_len(N, True)
    db, lead_rad = over_hz(PORTS, np.fft.rfftfreq(size, 1 / SR))
    ratio = undb(db) * np.exp(1j * lead_rad)
    # side over mid that gives this left-to-right ratio
    side_share = (ratio - 1) / (ratio + 1)
    side = irfft(rfft(x, size) * side_share, size)[:N] * curves(BEARING)[0]
    return np.array([x + side, x - side])


def scene(hard_duck=0.29):
    """The plane over the field; hard firings replace a share of the ordinary ones."""
    turns = crank()
    firing = engine(turns) * (1 - hard_duck * hardness()) + pops(turns)
    exhaust = firing + pipe_notes(turns) + putter(turns) + hum(turns) + stumble(turns)
    plane = exhaust + propeller(turns) + blades(turns) + wash()
    return microphones(plane) + scattered(plane) + outdoors()


def record(dry, top_hz=15200):
    """A steep elliptic low-pass cuts the top."""
    return signal.sosfilt(signal.ellip(8, .2, 70, top_hz, fs=SR, output="sos"), dry)


dry = scene()
out = record(dry)
store_wav(out)
```